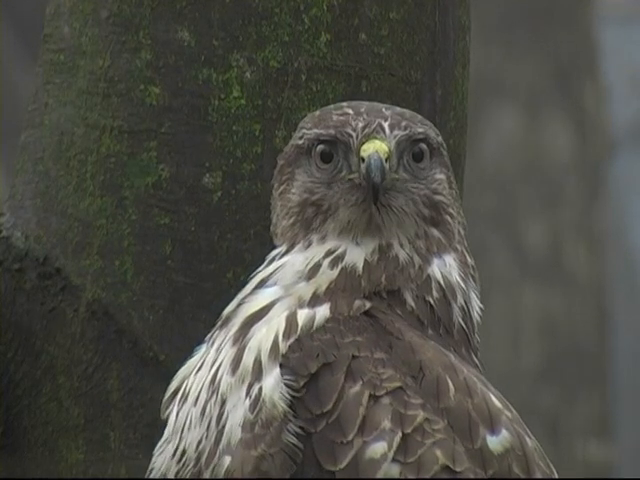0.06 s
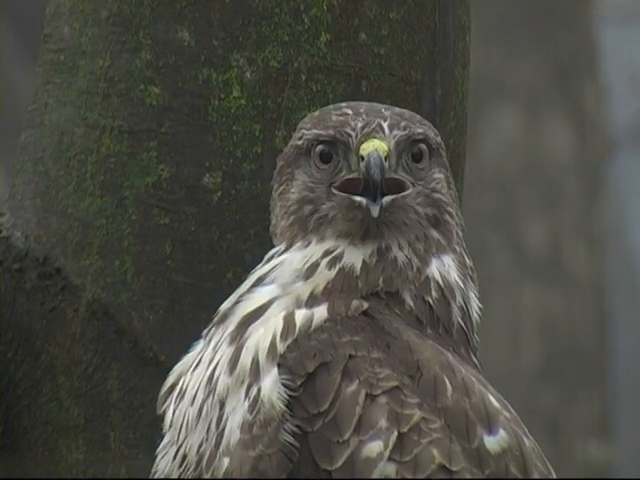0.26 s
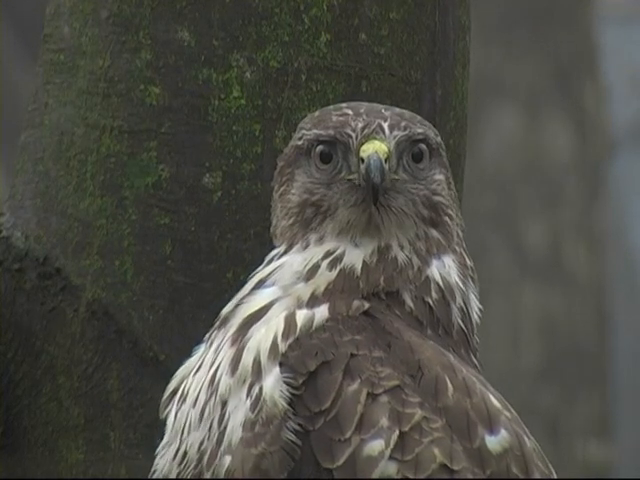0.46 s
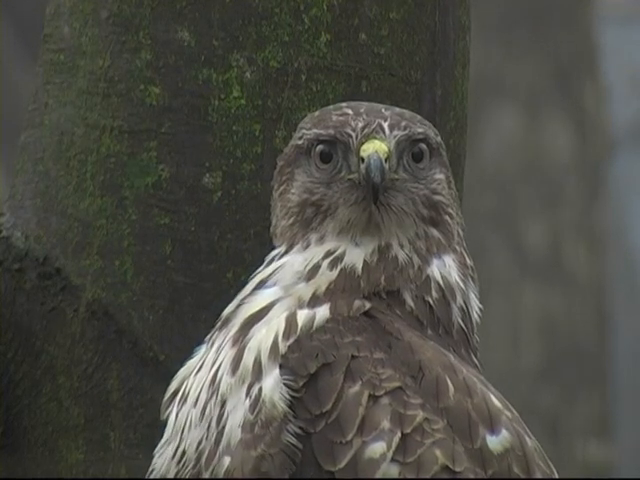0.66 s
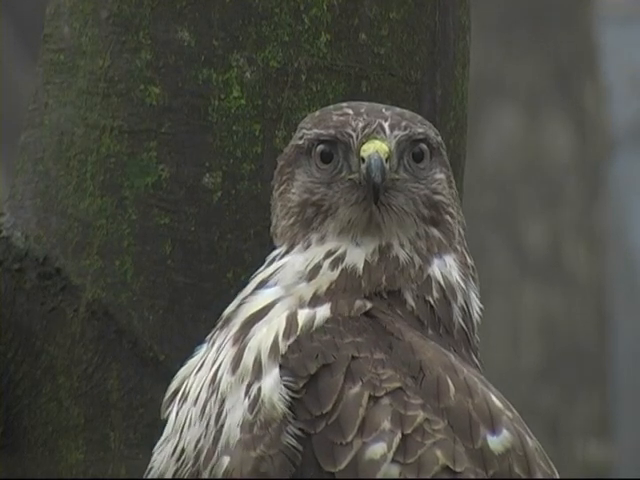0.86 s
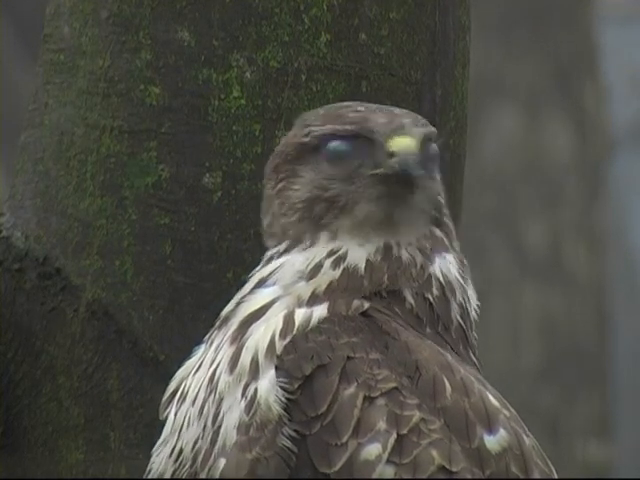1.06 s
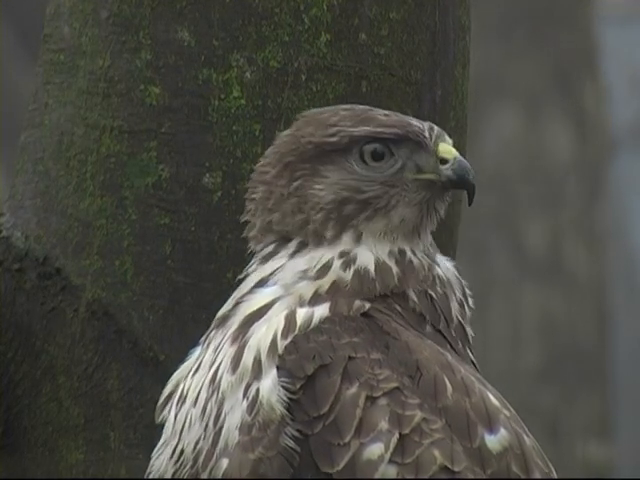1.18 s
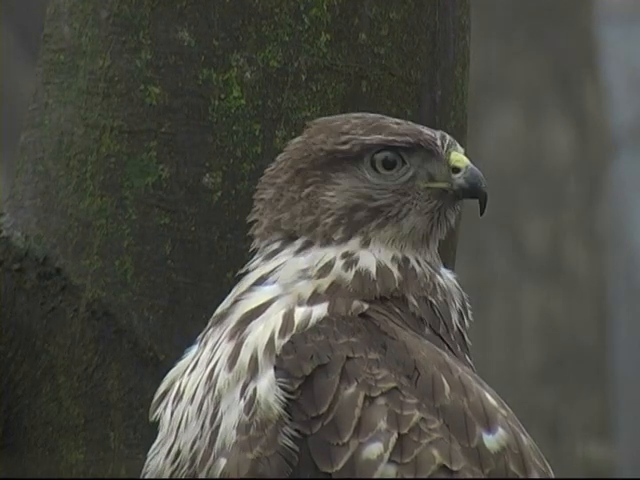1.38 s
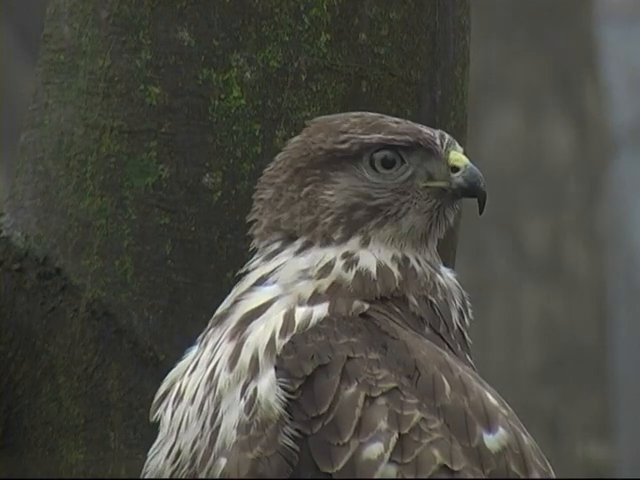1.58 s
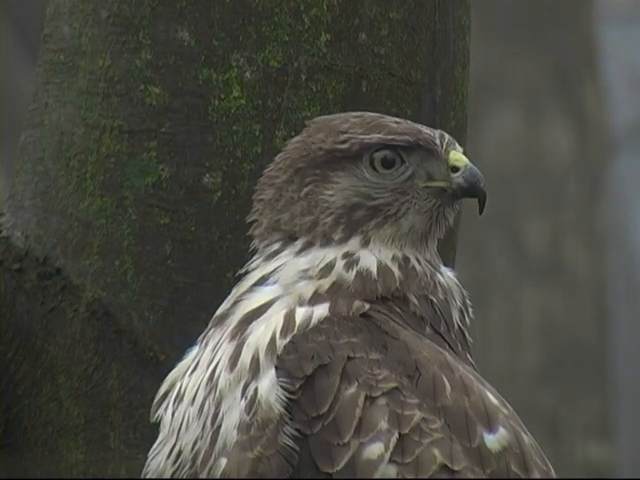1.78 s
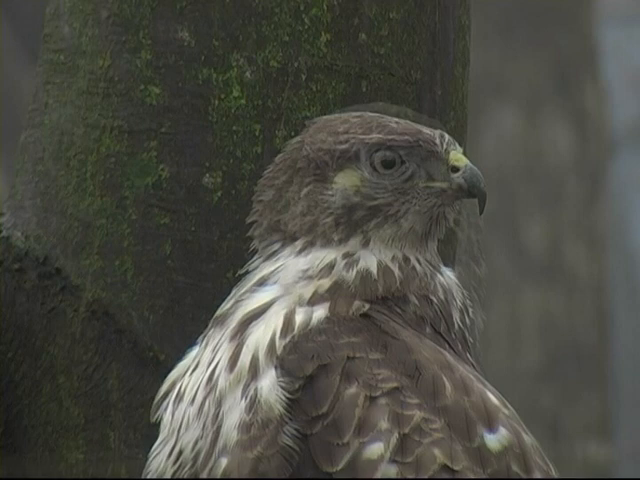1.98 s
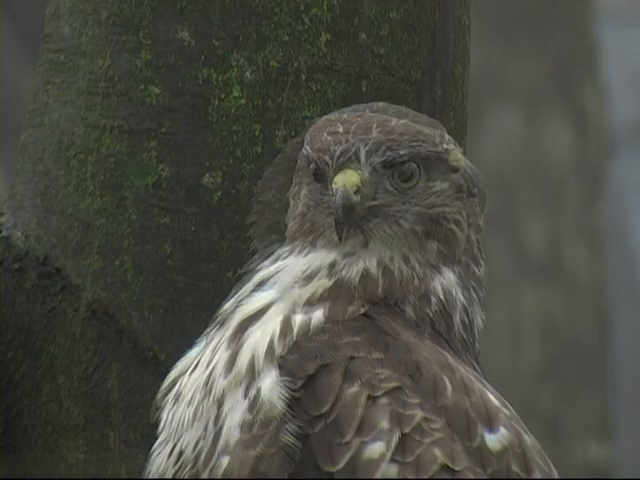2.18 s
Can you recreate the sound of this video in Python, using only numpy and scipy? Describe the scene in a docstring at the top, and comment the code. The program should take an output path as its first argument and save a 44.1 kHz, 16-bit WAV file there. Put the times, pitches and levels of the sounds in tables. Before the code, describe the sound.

A buzzard calls once, close to the microphone: a shrill whistle climbs and swells, then breaks into a hoarse falling rasp. It echoes briefly through a forest, where distant small birds and a few dull knocks sound over a soft rush.

```python
"""A forest, with a buzzard close to the microphone. Over a soft outdoor rush it gives one call: a pure
whistle that climbs, swells until it overloads the recorder, then breaks into a hoarse low voice that
falls away, with puffs of air from the beak. Trunks scatter the call back from near and far.
Small birds pipe in the distance, and a few dull knocks sound."""
import sys
import numpy as np
from scipy import signal
from scipy.fft import rfft, irfft
from scipy.io import wavfile
from scipy.ndimage import uniform_filter1d

SR = 44100
rng = np.random.default_rng(int(sys.argv[2]) if len(sys.argv) > 2 else 0)


def to_wav(sig):
    """Store sig (one row per channel, or 1-D mono) as 16-bit WAV at the path in sys.argv[1].

    Samples outside -1..1 are clipped; the rate is SR.
    """
    pcm = np.clip(np.atleast_2d(sig), -1, 1) * 32767
    pcm = np.round(pcm).astype(np.int16)
    wavfile.write(sys.argv[1], SR, pcm.T)  # frames by channels


N = 99225

# outdoor rush: freq_hz, relative_db
RUSH_COLOUR = [(15, -32), (25, -17), (91, 0), (156, -2), (188, -5), (281, 0), (313, -2.5), (469, -2),
               (3830, -20.5), (4260, -22.5), (4870, -24), (6550, -26), (7100, -25), (8130, -27.5),
               (15500, -33.5)]
# stereo width of the rush: freq_hz, side_to_mid_db
RUSH_WIDTH = [(40, -15), (70, -47), (130, -4.5), (300, -9.5), (1000, -5), (4000, -6), (12000, -13)]
# lean of the rush: freq_hz, left_minus_right_db
RUSH_BALANCE = [(60, -2), (130, 0), (260, 4), (520, 0.5), (1000, 1.2), (8000, -0.65)]
# loudness of the rush: time_s, level_db
RUSH_FADE = [(0, -37), (.6, -37.5), (1.8, -37.5), (2.05, -39.5), (2.25, -42)]
# climb and plunge of the whistle: time_s, pitch_hz
WHISTLE_GLIDE = [(.155, 3680), (.187, 4430), (.208, 4734), (.228, 4790), (.25, 5025), (.275, 5196),
                 (.3, 5570), (.32, 5760), (.324, 5420), (.362, 5390), (.376, 5230), (.385, 5000),
                 (.39, 4476), (.395, 2990)]
# effort behind the whistle: time_s, level_db, roughness (0-1), octave_to_tone_db
WHISTLE_FORCE = [(.154, -47, 0.2, -12.5), (.159, -35.5, 0, -17), (.186, -25.5, 0.17, -20.5),
                 (.196, -25, 0.7, -28), (.21, -26, 0.17, -33), (.245, -18, 0.06, -30.5), (.3, -9, .04, -45),
                 (.343, -7, 0.08, -30.5), (.352, -9, 0, -31.5), (.361, -2.5, 0.13, -33),
                 (.371, -8.5, .06, -31.5), (.378, -4.5, 0, -45), (.39, 2, 0.25, -43),
                 (.3935, -20, 0.03, -19), (.397, -33.5, 0.3, -14)]
# hiss of air as the whistle is forced hardest: time_s, level_db
HISS_LEVEL = [(.355, -70), (.362, -39.5), (.369, -49), (.378, -34.5), (.391, -23), (.4, -61)]
# colour of that hiss: freq_hz, relative_db
HISS_COLOUR = [(300, -13), (2000, -9.5), (5000, -2), (8000, -6), (11000, -1), (15000, -5)]
# echo from the far trunks: freq_hz, gain_db
FAR_ECHO_COLOUR = [(500, 8), (1800, 6.5), (3000, -4), (4700, -2.5), (5150, -2), (5500, 2), (6000, -14),
                   (12000, -9.5)]
# broken low voice: time_s, pitch_hz, level_db, roughness (0-1)
BROKEN_VOICE = [(.391, 1492, -34, 0.53), (.396, 1632, -23, 0.21), (.404, 1909, -20, 0.7),
                (.411, 1870, -14, 0.4), (.422, 1894, -15, 0.12), (.432, 1770, -24.5, 0.08),
                (.436, 1294, -16, 0.3), (.45, 1068, -22, 0.16), (.467, 876, -22, 0.6),
                (.479, 712, -33, 0.6), (.488, 650, -52, 0.6)]
# throat with the beak open: freq_hz, gain_db
THROAT_SHAPE = [(300, -20), (700, -0.5), (1200, -4.5), (1850, -2.5), (2700, -8.5), (3700, -7), (5200, -20),
                (6200, -13.5), (7600, -19.5), (10000, -35), (15000, -52.5)]
# breathy rasp of the low voice: freq_hz, relative_db
RASP_COLOUR = [(300, -18), (900, -13.5), (1400, 1), (1900, -0.5), (2500, -12), (3200, 0.5), (3900, -5),
               (4900, -2), (5500, -4), (6100, -13.5), (7600, -12), (10000, -32), (15000, -41)]
# puffs of air from the beak: centre_s, half_width_s, level_db
BEAK_PUFFS = [(0.397, 0.023, -36.5), (0.45, 0.013, -35)]
# bass of those puffs: freq_hz, relative_db
PUFF_COLOUR = [(15, 0), (45, 12), (90, -27), (300, -40), (2000, -69)]
# far songbirds: start_s, length_s, start_hz, end_hz, level_db, waver (share of pitch)
SONG_NOTES = [(0.597, 0.056, 8800, 7940, -46, 0.13), (0.605, 0.047, 3745, 4010, -43.5, 0.056),
              (0.651, 0.054, 3670, 4600, -43, .03), (.69, 0.17, 7200, 7130, -57, .007),
              (0.851, .22, 7150, 7020, -53, .007), (1.092, 0.3, 7120, 6980, -59, .01),
              (1.778, .035, 7200, 7320, -43.5, 0.054), (1.81, 0.043, 7870, 5170, -35.5, .035),
              (1.903, 0.088, 7300, 7450, -47, 0.0318), (1.942, 0.0266, 7000, 5670, -44, .04),
              (1.99, 0.098, 7400, 7240, -51, 0.031), (2.052, 0.074, 4250, 4323, -45, .012)]
# dull knocks: start_s, level_db, pitch_hz, attack_s
KNOCK_HITS = [(.69, -20, 422, 0.007), (1.527, -20, 828, 0.011), (1.545, -18, 409, 0.0053),
              (1.885, -10, 485, 0.0072), (1.896, -12.5, 669, 0.0036), (1.925, -20.5, 403, 0.0043)]
# thud within each knock: freq_hz, relative_db
THUD_COLOUR = [(100, -21), (350, 3.5), (650, 4), (1200, -6), (2000, -14.5), (4000, -26), (10000, -39)]

LEFT_RIGHT = np.array([[1], [-1]])  # sign of the side signal in each channel


def undb(db):
    """Decibels to gain."""
    return 10 ** (np.asarray(db) / 20)


def clock():
    """Time of every sample in seconds."""
    return np.arange(N) / SR


def curve(table, column=1):
    """One column of a table joined by straight lines in time."""
    rows = np.array(table)
    return np.interp(clock(), rows[:, 0], rows[:, column])


def gate(table):
    """1 between the first and last time of a table."""
    return (clock() > table[0][0]) * (clock() < table[-1][0])


def response(shape, hz):
    """Gain of a (freq_hz, gain_db) shape at the given frequencies."""
    rows = np.array(shape)
    return undb(np.interp(np.log(hz + 1), np.log(rows[:, 0]), rows[:, 1]))


def colour(x, shape):
    """Filter by a (freq_hz, gain_db) shape."""
    return irfft(rfft(x) * response(shape, np.arange(N // 2 + 1) * SR / N), N)


def noise(shape):
    """Noise of a given colour, rms 1."""
    x = colour(rng.standard_normal(N), shape)
    return x / x.std()


def walk(rate_hz):
    """Smooth random wandering, spread 1."""
    size = max(int(SR / rate_hz), 1)
    x = uniform_filter1d(uniform_filter1d(rng.standard_normal(N), size), size)
    return x / x.std()


def strike(start_s, attack_s, t60_s):
    """Envelope that rises briefly and dies away."""
    age = np.maximum(clock() - start_s, 0)
    return np.minimum(age / attack_s, 1) * undb(-60 * age / t60_s)


def swell(centre_s, half_width_s):
    """Bell-shaped envelope, peak 1."""
    return np.exp(-((clock() - centre_s) / half_width_s) ** 2)


def turn(hz):
    """Phase of a moving pitch."""
    return 2 * np.pi * np.cumsum(hz) / SR


def outdoor_rush():
    """Distant rush, nearly alike in both channels in the deep bass; its level flickers slightly."""
    side = colour(noise(RUSH_COLOUR), RUSH_WIDTH)
    left, right = noise(RUSH_COLOUR) + LEFT_RIGHT * side
    level_db = curve(RUSH_FADE) + .4 * walk(12)
    return np.array([colour(left, RUSH_BALANCE), right]) * undb(level_db)


def high_ring():
    """A faint, narrow band of treble hangs in the trees and fades."""
    pitch_hz, width_hz = 4800, 250
    ring = np.sqrt(2) * walk(2 * width_hz) * np.sin(turn(pitch_hz + width_hz * walk(1600)))
    return undb(-47) * ring * strike(0, attack_s=.0016, t60_s=.7)


def buzzard_whistle():
    """Close up: a nearly pure tone climbs with effort, hisses under strain and plunges."""
    rough = curve(WHISTLE_FORCE, column=2)
    jitter = .047 * rough * walk(1350) + .0023 * walk(170)
    phase = turn(curve(WHISTLE_GLIDE) * (1 + jitter))
    octave = undb(curve(WHISTLE_FORCE, column=3)) * np.sin(2 * phase)
    half_tones = np.sin(phase / 2) + np.sin(1.5 * phase)
    tone = np.sin(phase) + octave + undb(-35.5) * swell(.263, .03) * half_tones
    hiss = noise(HISS_COLOUR) * undb(curve(HISS_LEVEL)) * gate(HISS_LEVEL)
    level_db = curve(WHISTLE_FORCE) + 3.3 * rough * walk(820)
    return np.sqrt(2) * tone * undb(level_db) * gate(WHISTLE_FORCE) + hiss


def trunk_echo(x, t60_s, build_s, width=.68):
    """Reflections from many trunks build up at the microphone and die away, in stereo."""
    mid, side = rng.standard_normal((2, N))
    echo = (mid + width * side * LEFT_RIGHT) * strike(0, build_s, t60_s)
    echo /= np.sqrt(np.sum(echo ** 2) / 2)
    return signal.fftconvolve(x[None], echo, axes=1)[:, :N]


def buzzard_low_voice():
    """The voice breaks downward twice; uneven, jittery cycles pass the throat with a rasp of air."""
    hz, rough = curve(BROKEN_VOICE), curve(BROKEN_VOICE, column=3)
    phase = turn(hz * (1 + .0584 * rough * walk(1200)))
    tone = sum(response(THROAT_SHAPE, k * hz) * k ** -.4 * np.sin(k * phase) for k in range(1, 9))
    uneven = 1 + .59 * rough * np.sin(phase / 3 + walk(150))  # strong and weak cycles in threes
    level_db = curve(BROKEN_VOICE, column=2) + 2.96 * rough * walk(550)
    voiced = np.sqrt(2) * tone * uneven * undb(level_db) * gate(BROKEN_VOICE)
    rasp = noise(RASP_COLOUR) * (1 + .5 * np.sin(phase))  # the air pulses with each cycle
    breath = strike(start_s=.393, attack_s=.0034, t60_s=.19)
    closing = np.clip((.47 - clock()) / .0096 + 1, 0, 1)  # shuts off just after 0.47 s
    return voiced + undb(-16.5) * rasp * breath * closing


def beak_puffs():
    """Low thumps of air close to the microphone as the call breaks."""
    envelope = sum(undb(db) * swell(centre_s, half_s) for centre_s, half_s, db in BEAK_PUFFS)
    return envelope * noise(PUFF_COLOUR)


def songbirds():
    """Far off: thin notes glide to their end pitch, with slightly more echo than direct sound."""
    notes = np.zeros(N)
    for start_s, length_s, start_hz, end_hz, db, waver in SONG_NOTES:
        progress = np.clip((clock() - start_s) / length_s, 0, 1)
        hz = end_hz + (start_hz - end_hz) * (1 - progress) ** 3
        arch = np.sqrt(np.abs(np.sin(np.pi * progress)))
        notes += undb(db) * arch * np.sin(turn(hz * (1 + waver * walk(1200))))
    return undb(-1) * notes + trunk_echo(notes, t60_s=.845, build_s=.0039, width=.4)


def knocks():
    """Soft, hollow knocks among the trees, each a short low ring and a thud."""
    hits = np.zeros(N)
    for start_s, db, hz, attack_s in KNOCK_HITS:
        ring = np.sin(2 * np.pi * hz * (clock() - start_s)) * strike(start_s, attack_s, t60_s=.045)
        thud = noise(THUD_COLOUR) * strike(start_s, attack_s, t60_s=.11)
        hits += undb(db) * (ring + undb(-14) * thud)
    return hits + undb(-6.5) * trunk_echo(hits, t60_s=.23, build_s=.01)


def scene():
    """At the microphone: the call in the centre, its near and far echoes, and the forest around it."""
    call = buzzard_whistle() + buzzard_low_voice()
    near = undb(-10) * trunk_echo(call, t60_s=.21, build_s=.0077, width=1.07)
    far = undb(-23) * trunk_echo(colour(call, FAR_ECHO_COLOUR), t60_s=.81, build_s=.03)
    return call + near + far + beak_puffs() + songbirds() + knocks() + outdoor_rush() + high_ring()


def record(dry):
    """The overloaded recorder flattens the loudest peaks and cuts the top treble."""
    ceiling, top_hz = .7, 15900
    oversampled = signal.resample_poly(dry, 4, 1, axis=1)
    flattened = oversampled / (1 + (oversampled / ceiling) ** 24) ** (1 / 24)
    clipped = signal.resample_poly(flattened, 1, 4, axis=1)
    lowpass = signal.ellip(10, .1, 60, top_hz, fs=SR, output="sos")
    return signal.sosfiltfilt(lowpass, clipped)


dry = scene()
out = record(dry)
to_wav(out)
```